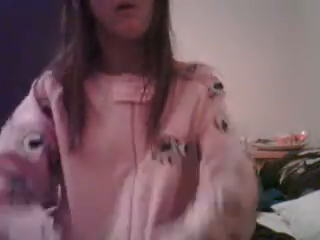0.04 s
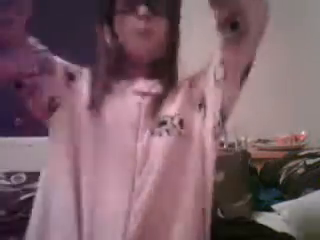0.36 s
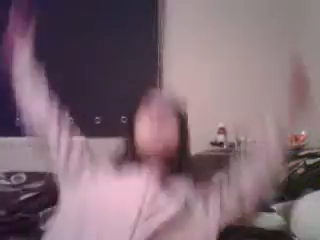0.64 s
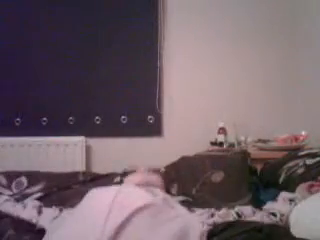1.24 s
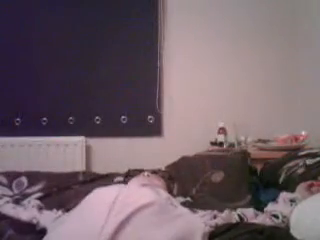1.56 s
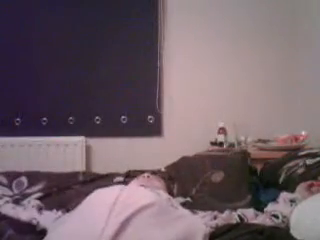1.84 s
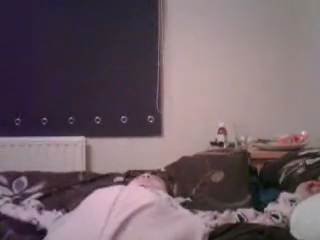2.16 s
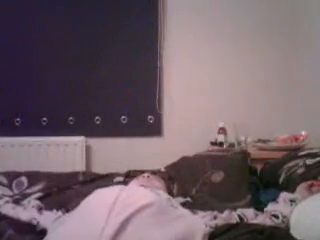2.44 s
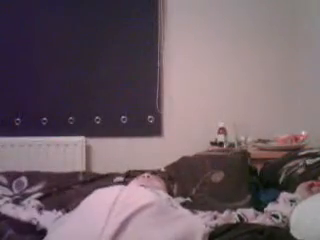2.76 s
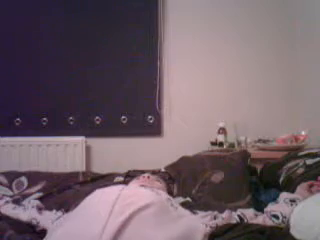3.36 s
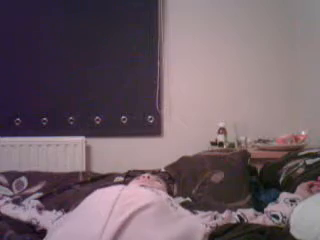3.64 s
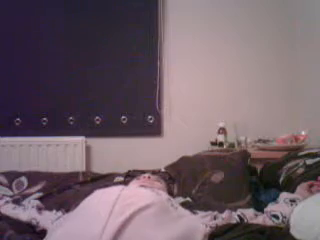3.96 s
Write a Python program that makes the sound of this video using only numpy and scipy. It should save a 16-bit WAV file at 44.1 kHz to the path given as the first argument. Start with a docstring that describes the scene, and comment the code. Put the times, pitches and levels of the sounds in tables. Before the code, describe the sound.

A person falls backwards onto a bed in a small, quiet bedroom. Sleeves flap first, then the body lands in dull thumps with rustling bedding, and the head settles more softly. A cheap microphone adds gritty hiss and low rumble.

```python
"""Falling back onto a bed

In a small, quiet bedroom someone in fleece throws up their arms, sleeves flapping, and falls backwards.
The body lands in a few soft blows, the bed booms, the bedding rustles; the head settles on the pillow.
A cheap microphone hears it dully over a low rumble; its coarse converter turns quiet to gritty hiss."""
import sys
import numpy as np
from scipy import signal
from scipy.fft import rfft, irfft, next_fast_len
from scipy.io import wavfile
from scipy.ndimage import map_coordinates

SR = 44100
rng = np.random.default_rng(int(sys.argv[2]) if len(sys.argv) > 2 else 0)


def generate_wav(sig):
    """Save sig (samples, or channels by samples) to the path in sys.argv[1] as 16-bit PCM at SR."""
    pcm = np.round(np.clip(np.atleast_2d(sig).T, -1, 1) * 32767).astype(np.int16)
    wavfile.write(sys.argv[1], SR, pcm)


N = 176400


def amp(db):
    """Decibels to gain."""
    return 10 ** (np.asarray(db) / 20)


def unit(x):
    """x at rms 1."""
    return x / np.sqrt(np.mean(x ** 2) + 1e-20)


def filtered(x, response):
    """x times a response of frequency."""
    m = next_fast_len(N + SR // 2)
    return irfft(rfft(x, m) * response(np.fft.rfftfreq(m, 1 / SR)), m)[:N]


def dull(hz, corner_hz):
    """Gain of a soft contact: 12 dB an octave down above the corner."""
    return 1 / np.sqrt(1 + (hz / corner_hz) ** 4)


def coloured(x, spectrum, corner_hz=np.inf):
    """x shaped by (Hz, dB) points and a low-pass corner, at rms 1."""
    points_hz, db = np.transpose(spectrum)

    def response(hz):
        return amp(np.interp(np.log(hz + 1), np.log(points_hz), db)) * dull(hz, corner_hz)
    return unit(filtered(x, response))


def since(s):
    """Seconds after the moment s, negative before it."""
    return np.arange(N) / SR - s


def fade(t, t60_s):
    """Exponential decay from t = 0."""
    return amp(-60 * np.maximum(t, 0) / t60_s)


def struck(t, attack_s, t60_s):
    """Envelope of something set going at t = 0."""
    return (1 - np.exp(-np.maximum(t, 0) / attack_s)) * fade(t, t60_s)


def ring(t, hz, attack_s, t60_s):
    """One damped mode."""
    return np.sin(2 * np.pi * hz * t) * struck(t, attack_s, t60_s)


def wobble(knots_per_s):
    """A smooth random curve."""
    knots = rng.standard_normal(int(N * knots_per_s / SR) + 4)
    return map_coordinates(knots, [np.arange(N) * knots_per_s / SR])


def tones(lines):
    """Steady sines from (Hz, dB) rows."""
    return sum(np.sqrt(2) * amp(db) * np.sin(2 * np.pi * (hz * since(0) + rng.random()))
               for hz, db in lines)


# Spectra of room air and rumble. Each row: frequency in Hz, relative level in dB.
AIR_SPECTRUM = [(100, -8), (350, 4.5), (820, 4.5), (1000, 0), (2000, -4.5), (3000, -8.5), (4600, -8.5),
                (5500, -12), (12800, -22)]
RUMBLE_SPECTRUM = [(20, -28), (35, -10), (52, -2), (70, 2), (100, -7), (170, -9), (300, -15), (700, -32.5),
                   (2000, -60)]
# Room hum. Each row: frequency in Hz, level in dB.
HUM_TONES = [(652, -73.5), (704, -74), (800, -72.5), (850.6, -73)]


def background():
    """Soft room air, a wavering low rumble and a faint hum."""
    air = amp(-54) * coloured(rng.standard_normal(N), AIR_SPECTRUM)
    rumble_db = -52 + wobble(knots_per_s=5.2)
    rumble = amp(rumble_db) * coloured(rng.standard_normal(N), RUMBLE_SPECTRUM)
    return air + rumble + tones(HUM_TONES)


# Cloth rustles. Each row: peak time in seconds, level in dB, rise in seconds, T60 in seconds,
# low-pass corner in Hz.
RUSTLES = [(0.081, -52.5, 0.061, 1.2, 1810), (0.637, -46, 0.01, 0.3, 1550), (.768, -42, .011, 0.1, 1510),
           (0.787, -37, 0.0093, 0.3, 754), (.835, -38, .014, 0.2, 2570), (.888, -38, 0.035, 0.41, 720),
           (0.963, -48, 0.0072, 0.05, 850), (1.16, -53, 0.035, 0.2, 710), (1.301, -41.5, .002, 0.1, 950),
           (1.332, -37, .019, 0.22, 1700)]
# Rubbing cloth spectrum. Each row: frequency in Hz, relative level in dB.
CLOTH_SPECTRUM = [(40, -5), (120, -0.5), (200, -1), (260, -3), (340, -1), (500, 0), (740, 1.5), (900, -8),
                  (1100, -4.5), (1450, -12), (2150, -7.5), (2550, -18.5), (5000, -12), (12000, -22)]


def rustles():
    """Fleece brushes and bedding crushes: small folds slip by the hundred, swelling and dying away."""
    slips_per_s, slip_power_share = 1400, .3
    out = np.zeros(N)
    for peak_s, db, rise_s, t60_s, corner_hz in RUSTLES:
        t = since(peak_s)
        slips = unit((rng.random(N) < slips_per_s / SR) * rng.standard_normal(N))
        rub = np.sqrt(slip_power_share) * slips + np.sqrt(1 - slip_power_share) * rng.standard_normal(N)
        swell = np.exp(-(np.minimum(t, 0) / rise_s) ** 2)
        out += amp(db) * coloured(rub, CLOTH_SPECTRUM, corner_hz) * swell * fade(t, t60_s)
    return out


# Sleeve flaps. Each row: start in seconds, level in dB, relative puff level in dB, cloth T60 in seconds.
FLAPS = [(.294, -42, -11, 0.04), (.330, -39.5, 6, 0.33), (.356, -40, 2, 0.14), (0.375, -49, 15, 0.5)]
# Flapping cloth spectrum. Each row: frequency in Hz, relative level in dB.
FLAP_SPECTRUM = [(100, -7.5), (350, -2), (500, -10.5), (680, 2), (820, 0.5), (1000, -17), (1900, -17),
                 (2600, -26), (10000, -39)]


def sleeves():
    """Loose sleeves snap taut as the arms swing up: a hollow flap of cloth and a low puff of air."""
    attack_s = .0011
    out = np.zeros(N)
    for start_s, db, puff_db, t60_s in FLAPS:
        t = since(start_s)
        flap = amp(2.5) * coloured(rng.standard_normal(N), FLAP_SPECTRUM) * struck(t, attack_s, t60_s)
        puff = amp(puff_db) * ring(t, hz=143.7, attack_s=attack_s, t60_s=.12)
        out += amp(db) * (flap + puff)
    return out


# Body, then head, landing. Each row: start in seconds, level in dB, low-pass corner in Hz,
# relative boom level in dB.
BLOWS = [(.768, -44, 300, -9.5), (.798, -25.5, 123, -10.5), (.815, -26.5, 283, -23),
         (.821, -25.5, 605, -18), (.880, -37, 194, 4.5), (.894, -36, 610, -7), (0.941, -40.5, 149, -12.5),
         (1.305, -34, 462, -15.5), (1.361, -35, 297.5, -16), (1.420, -40, 121, -16)]
# Frame and mattress modes. Each row: frequency in Hz, relative level in dB, T60 in seconds.
BED_MODES = [(63.8, -9.5, .25), (116.6, -11, .33), (172.1, -3, .13), (203.2, -5.5, .14), (331, -5.5, .17),
             (388, -9.5, 0.13), (455, -6, .08), (581, -16, .12), (714, -10.5, .12)]
# Padded thud spectrum. Each row: frequency in Hz, relative level in dB.
THUD_SPECTRUM = [(25, -7), (62, 2.5), (105, -0.5), (180, 0.5), (255, -9.5), (380, 0), (720, -4.5),
                 (1000, -11), (2200, -34), (4000, -45)]


def blows():
    """Each blow is a soft push of air, a short ring of the bed and a padded thud."""
    push_width_s = .0012
    out = np.zeros(N)
    for start_s, db, corner_hz, _ in BLOWS:
        t = since(start_s)
        push = amp(1.5) * np.exp(-(t / push_width_s - 2) ** 2)
        modes = np.zeros(N)
        for hz, mode_db, t60_s in BED_MODES:
            gain = amp(mode_db + rng.normal(0, 1.5)) * dull(hz, corner_hz)
            modes += gain * ring(t, hz, attack_s=.0017, t60_s=t60_s)
        thud_noise = coloured(rng.standard_normal(N), THUD_SPECTRUM, corner_hz)
        thud = amp(-8.5) * thud_noise * struck(t, attack_s=.003, t60_s=.12)
        out += amp(db) * (push + modes + thud)
    return out


# Lowest bed modes. Each row: frequency in Hz, relative level in dB, T60 in seconds.
BOOM_MODES = [(48.88, 0, 1.05), (60.3, -10, 1.1)]


def boom():
    """The bed's two lowest modes ring on after each blow, beating as they die away."""
    return sum(amp(db + boom_db + mode_db) * ring(since(start_s), hz, attack_s=.008, t60_s=t60_s)
               for start_s, db, _, boom_db in BLOWS
               for hz, mode_db, t60_s in BOOM_MODES)


def bedroom(x):
    """Short reverberation of a furnished room."""
    tail = rng.standard_normal(N) * struck(since(0), attack_s=.0049, t60_s=.2)
    return signal.fftconvolve(x, tail / np.linalg.norm(tail))[:N]


def scene():
    """The fall and its reverberation, plus the bed's boom and the background; mono."""
    floor = background()
    fall = blows() + sleeves() + rustles()
    return (floor + fall + boom() + amp(-12) * bedroom(fall))[None]


# Electrical whine. Each row: frequency in Hz, level in dB.
WHINE_TONES = [(9275, -80), (10503, -86), (12775, -83)]


def record(dry):
    """A coarse converter pulls the sound to its steps, adds noise, whine and DC, and cuts the top."""
    step, rest_steps, rounding_share = .0068, .42, .76
    cutoff_hz, dc_offset = 12900, -.1369
    sound = dry[0]
    stepped = step * (np.round(sound / step + rest_steps) - rest_steps)
    self_noise = amp(-57.5) * rng.standard_normal(N) + tones(WHINE_TONES)
    converted = sound + rounding_share * (stepped - sound) + self_noise
    return filtered(converted, lambda hz: hz < cutoff_hz)[None] + dc_offset


dry = scene()
out = record(dry)
generate_wav(out)
```